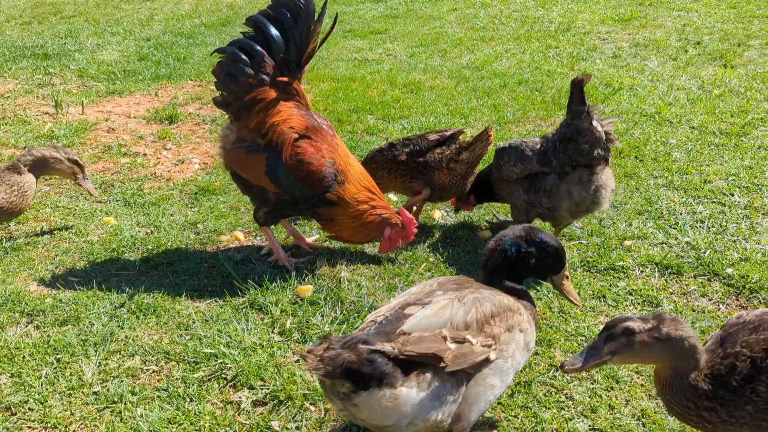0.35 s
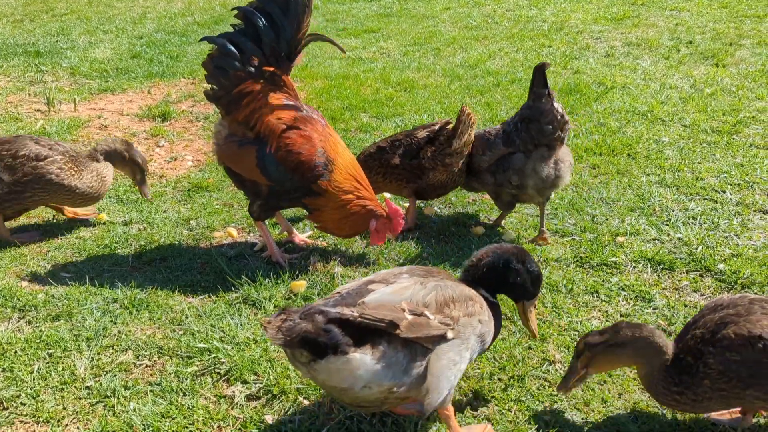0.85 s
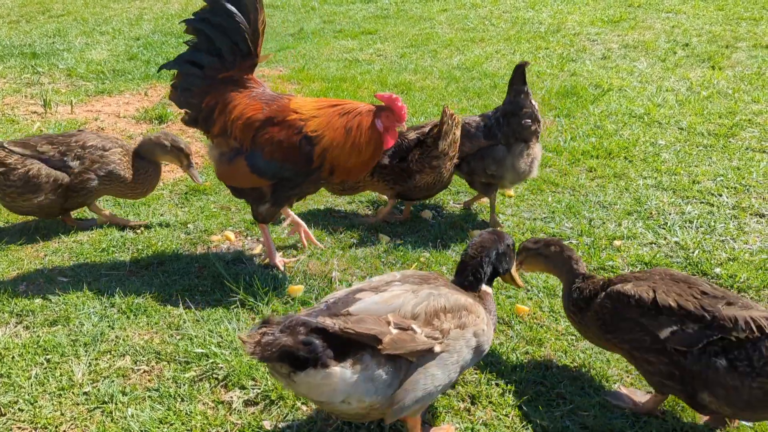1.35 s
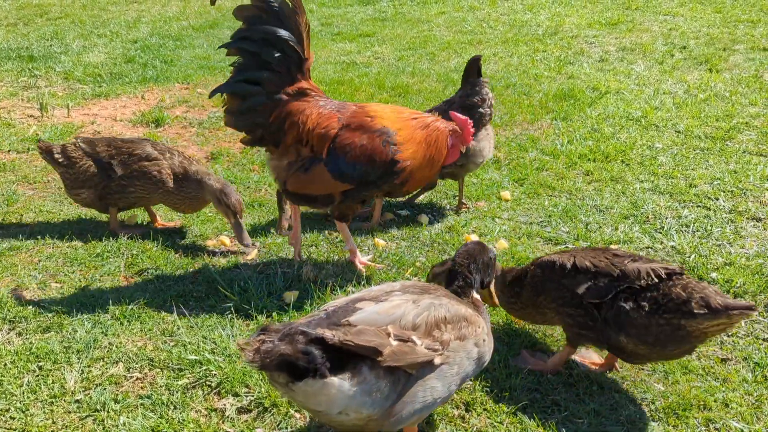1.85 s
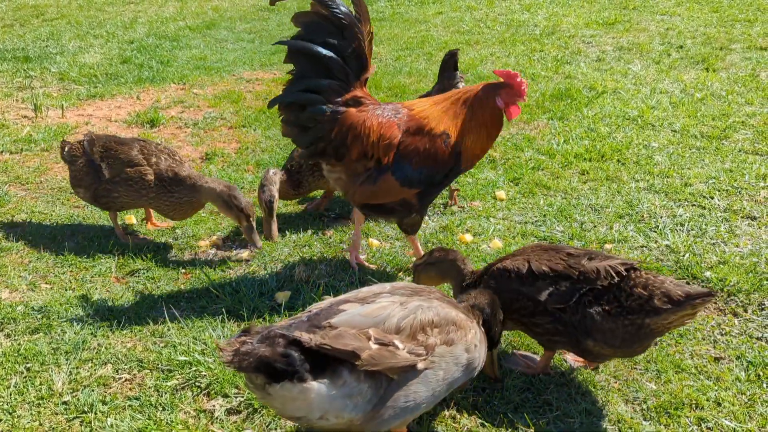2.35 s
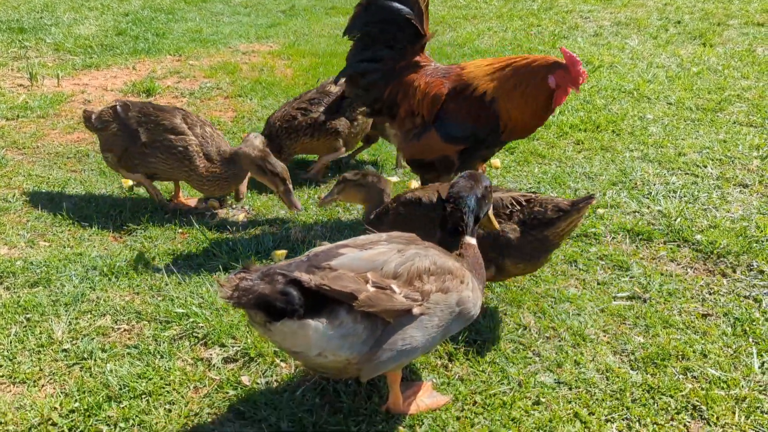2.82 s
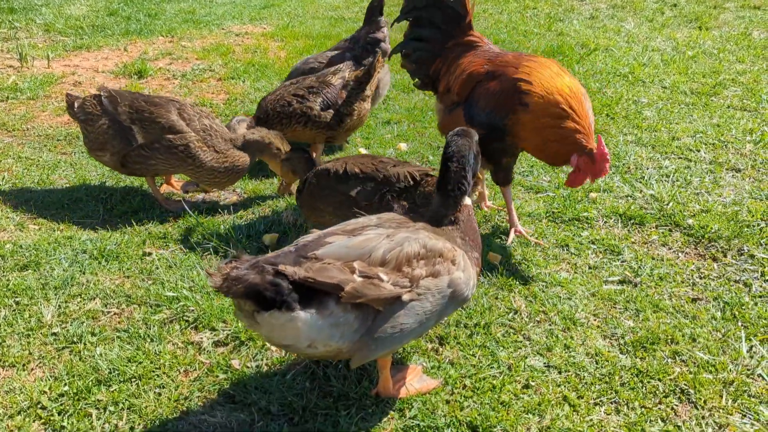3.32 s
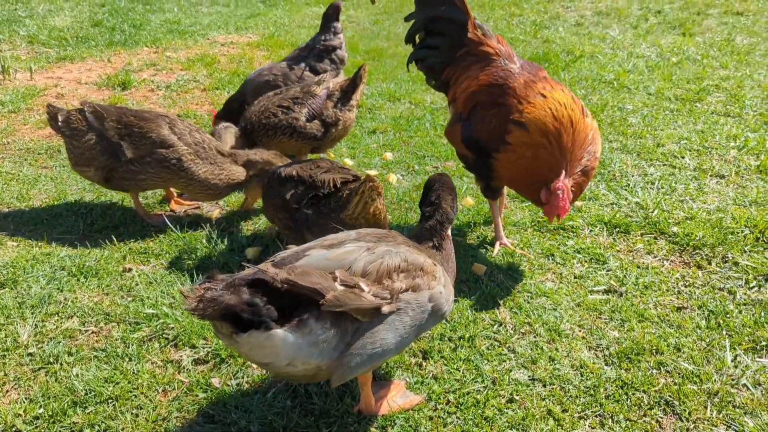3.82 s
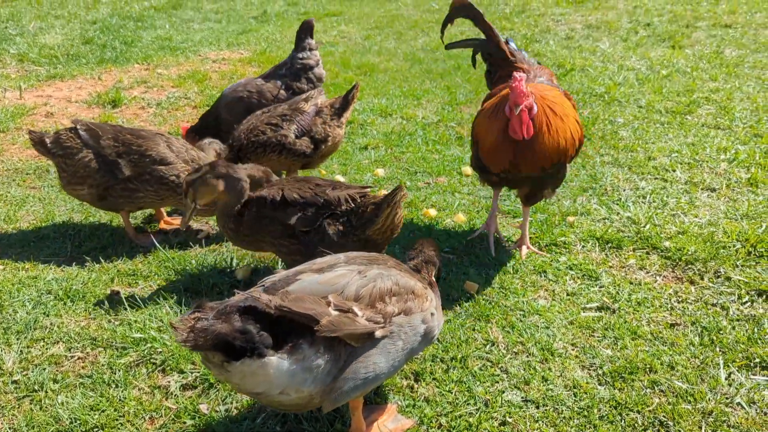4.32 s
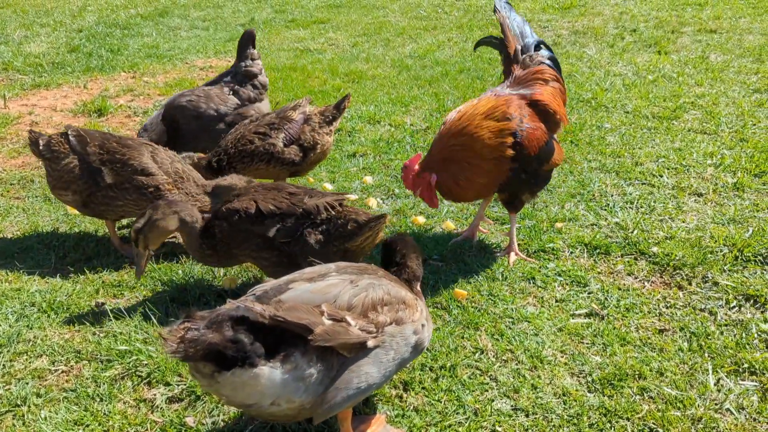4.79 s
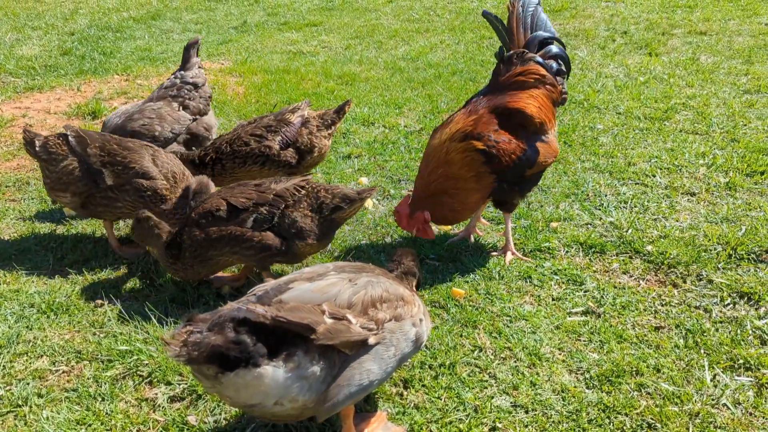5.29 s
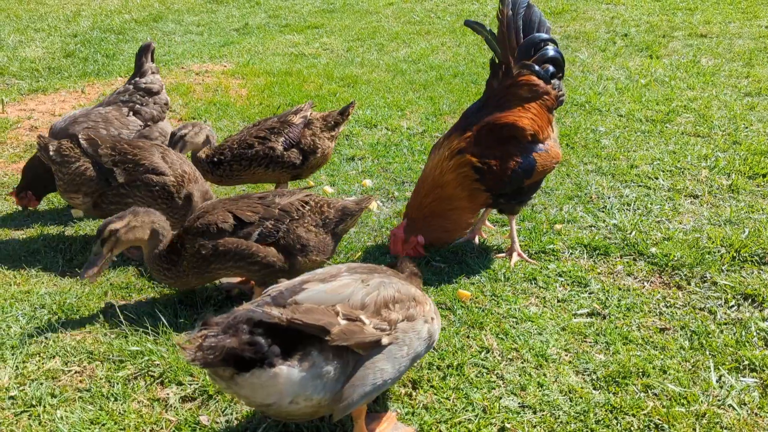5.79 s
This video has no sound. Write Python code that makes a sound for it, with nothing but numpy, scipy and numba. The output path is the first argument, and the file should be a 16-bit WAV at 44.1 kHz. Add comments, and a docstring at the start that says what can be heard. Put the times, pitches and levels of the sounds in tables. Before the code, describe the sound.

A quiet outdoor lawn, close and dry, heard in stereo through a handheld phone. A drake near the right rasps briefly at 0.2 s, then gives a breathy, fluttering rattle from 0.25 to 0.8 s, swelling toward its end. Short hoarse quacks follow at 1.3, 1.6, 2.2 and 2.45 s, then three stronger ones at 3.1, 3.4 and 3.65 s. Very short soft clucks pop at about 1.1, 3.0, 3.2, 3.8 and 5.2 s, with a brighter duck-like honk at 1.8 s. Sharp pecks tick at 1.15, 2.05 and 3.7 s; dull bumps and a bill clack come near 0.93 and 3.1 s. Grass rustles most in the first 1.5 s and again around 3.7 s. Wind thumps each side separately, mainly from 0.4 to 2.2 s. Faint songbird whistles glide at 1.4, 2.0 and 3.9-4.9 s, with a weak wavering low hum under a soft hush. The last two seconds are sparse.

```python
"""A garden lawn with a phone held over it, a microphone port at left and right, a drake close by on the right.
His soft rasps are puffs of air ringing a windpipe; clucks and one duck-like honk are short pulse trains.
Bills clack and peck among dull low bumps, all bursts of noise that ring briefly.
Feet and bills rustle the grass as filtered noise, and wind buffets each port on its own.
Far off, a songbird whistles in glides and a hum wavers over the garden's hush of coloured noise."""
import sys
import numpy as np
from scipy import signal
from scipy.fft import rfft, irfft
from scipy.io import wavfile
from scipy.ndimage import uniform_filter1d
from numba import njit

SR = 44100
rng = np.random.default_rng(int(sys.argv[2]) if len(sys.argv) > 2 else 0)


def generate_wav(signal):
    """Clip the signal to [-1, 1] and save it as 16-bit WAV at the path in sys.argv[1]."""
    frames = np.transpose(np.atleast_2d(signal))
    scaled = np.clip(frames, -1, 1) * 32767
    pcm = np.round(scaled).astype(np.int16)
    wavfile.write(sys.argv[1], SR, pcm)


def invert_db(level):
    """Linear amplitude ratio for a level in decibels (20 dB per decade), elementwise."""
    return 10 ** (np.asarray(level, dtype=float) / 20)


N = 260631
TIME = np.arange(N) / SR


def unit(x):
    """Scale to rms 1."""
    return x / np.sqrt(np.mean(x ** 2))


def pan(db):
    """Gains of left and right for a left minus right level in dB."""
    return invert_db(np.array([db / 2, -db / 2]))


@njit
def svf(x, hz, width):
    """State-variable band-pass with a moving centre, as a resonance rings."""
    y, b, l = np.empty(len(x)), 0., 0.
    for i in range(len(x)):
        g, k = np.tan(np.pi * hz[i] / SR), width / hz[i]
        v = (b + g * (x[i] + 1e-18 - l)) / (1 + g * (g + k))
        b, l, y[i] = 2 * v - b, l + 2 * g * v, k * v
    return y


def svf_pair(x, hz, first_width, second_width):
    """Two band-passes in a row on one centre, for steeper skirts."""
    return svf(svf(x, hz, first_width), hz, second_width)


def coloured(points, channels):
    """Noise of a (frequency [Hz], level [dB]) spectrum."""
    hz, db = np.transpose(points)
    log_hz = np.log(np.fft.rfftfreq(N, 1 / SR) + 1)
    gain = invert_db(np.interp(log_hz, np.log(hz), db, left=-90))
    return unit(irfft(rfft(rng.standard_normal((channels, N))) * gain, N))


def band(low_hz, high_hz):
    """Two unrelated noises between two edges."""
    edges = signal.butter(3, [low_hz, high_hz], "band", fs=SR, output="sos")
    return unit(signal.sosfilt(edges, rng.standard_normal((2, N))))


def walk(rate_hz):
    """Random levels held 1 / rate_hz and slewed twice; spread near 1."""
    k = int(SR / rate_hz)
    steps = np.repeat(rng.standard_normal(N // k + 1), k)
    return 1.3 * uniform_filter1d(uniform_filter1d(steps, k), k)[:N]


def add(out, s, sound, pan_db):
    """Place a short sound at s seconds, between left and right."""
    i = int(s * SR)
    out[:, i:i + sound.shape[-1]] += (pan(pan_db)[:, None] * sound)[:, :N - i]


def faint(count, top_db, spread_db):
    """Chance times, levels, sizes and places of small sounds, louder where the grass is busy."""
    chance = rng.random((count, 4)).T
    s = chance[0] * (TIME[-1] - .1) + .05
    busy_db = .3 * (np.interp(s, *np.transpose(GRASS_ACTIVITY)) + 80)
    return s, top_db - spread_db * chance[1] + busy_db, chance[2], 16 * (chance[3] - .5)


def ticks(events, ring_width, broad_db, rise_s):
    """A burst of noise that dies fast: a short ring at its centre over a broad crack."""
    out = np.zeros((2, N))
    t = np.arange(3000) / SR
    for s, db, hz, t60, pan_db in events:
        decay = np.exp(-np.log(1000) * t / t60)
        crack = rng.standard_normal(len(t)) * decay * np.minimum(t / rise_s, 1)
        centre = np.full(len(t), min(hz, 15000.))
        ring = svf_pair(crack, centre, ring_width * hz, 0.767 * ring_width * hz)
        broad = svf(crack, np.full(len(t), 5000.), 10040.0)
        tick = ring / abs(ring).max() + invert_db(broad_db) * broad
        add(out, s - rise_s / 2, invert_db(db) * tick, pan_db)
    return out


# spectrum of the far garden: (frequency [Hz], relative level [dB])
HUSH_COLOUR = [(88, -22), (150, 3), (280, -12), (341, -6), (637, -14), (979, -17), (1790, -16.5),
               (3350, -19), (4670, -29.5), (6140, -21.5), (9260, -42), (15100, -27.5), (16000, -41)]


def hush(level_db=-75.5):
    """Far garden noise drifting slowly; the ports hear it nearly unrelated, a little opposed in deep bass."""
    mid, side = coloured(HUSH_COLOUR, channels=2)
    bass = signal.sosfilt(signal.butter(1, 500, fs=SR, output="sos"), side)
    side = side - 2.1 * bass
    return invert_db(level_db + 0.68 * walk(0.53)) * (mid + np.array([[1], [-1]]) * side)


# course of the far tone before its quick waver: (time [s], level [dB])
HUM_COURSE = [(0.0, -95), (0.66, -70), (0.79, -67.5), (1.8, -76.5), (1.91, -65), (2.0, -77.5), (2.29, -76),
              (2.43, -100), (2.65, -71), (3.03, -92), (3.14, -60.5), (3.29, -54), (3.6, -69), (3.77, -54.5),
              (3.85, -72.5), (4.2, -74), (4.4, -89), (4.76, -77), (4.92, -60.5), (5.05, -78), (5.48, -81),
              (5.65, -57.5), (5.91, -71.5)]


def hum(hum_hz=167.1, octave_db=-83, octave_follows=0.323):
    """A far tone and its steadier octave, wavering in pitch and level, alike at both ports."""
    course_db = np.interp(TIME, *np.transpose(HUM_COURSE))
    phase = 2 * np.pi * np.cumsum(hum_hz * (1 + .01 * walk(30))) / SR
    first = invert_db(course_db + 4.5 * walk(45)) * np.sin(phase)
    upper_db = octave_db + octave_follows * (course_db + 78) + 3.5 * walk(25)
    return first + invert_db(upper_db) * np.sin(2 * phase)


# far whistles: (time [s], length [s], first, middle and last pitch [Hz], level before blur [dB])
CHIRPS = [(1.4, 0.12, 2900, 3150, 2220, -81), (3.87, 0.087, 3200, 2970, 2670, -80.5),
          (4.001, 0.055, 3400, 3040, 2950, -80.5), (4.411, 0.088, 3400, 2980, 2400, -81),
          (4.49, 0.036, 2700, 3520, 4570, -80.5), (4.54, 0.093, 4000, 3360, 2950, -76),
          (1.97, 0.07, 2900, 2550, 2300, -80), (4.719, 0.11, 1450, 1602, 1850, -81.5),
          (4.87, 0.089, 1850, 1850, 2000, -75.5)]


def songbird(warble=.045, blur_db=5.2):
    """Faint gliding whistles, unsteady in pitch and blurred in level by distance."""
    out = np.zeros((2, N))
    for s, length, *hz, db in CHIRPS:
        u = np.arange(0, length, 1 / SR) / length
        wobble, blur = unit(uniform_filter1d(rng.standard_normal((2, 8000)), size=120))[:, :len(u)]
        pitch_hz = np.interp(u, [0, .5, 1], hz) * (1 + warble * wobble)
        tone = np.sin(2 * np.pi * np.cumsum(pitch_hz) / SR)
        add(out, s, invert_db(db + blur_db * blur) * tone * np.sin(np.pi * u) ** 0.13, 0)
    return out


# spectrum of the wind at a port: (frequency [Hz], relative level [dB])
WIND_COLOUR = [(20, -26.5), (45, -2), (110, 1), (200, -10), (400, -27.5), (700, -61)]
# breeze before its gusts: (time [s], level [dB])
BREEZE = [(0.0, -74.5), (0.55, -76.5), (0.7, -62.5), (1.4, -60.5), (1.6, -72.5), (2.3, -66), (2.45, -71),
          (3.0, -73.5), (3.3, -64.5), (3.8, -65), (4.3, -76.5), (5.3, -74), (5.91, -74)]
# eddies that thump a port: (middle time [s], length [s], left level [dB], right level [dB])
THUMPS = [(0.402, 0.015, -42, -85), (0.625, 0.0091, -70, -42), (0.748, 0.11, -60, -46.5),
          (0.906, 0.012, -50, -38.5), (1.097, 0.0089, -56, -46.5), (1.183, .01, -62, -46),
          (1.282, 0.039, -66, -55), (1.456, 0.0077, -74, -53), (1.653, 0.053, -36.5, -53.5),
          (1.706, .01, -47, -75), (1.819, 0.0091, -41, -68), (1.862, 0.011, -77, -48),
          (1.961, 0.05, -44, -53), (2.232, 0.0088, -58, -48.5), (2.74, 0.11, -72.5, -65.5),
          (3.188, 0.059, -64, -59), (3.407, 0.023, -55, -62), (4.02, 0.034, -68, -71),
          (4.508, 0.052, -61.5, -84), (4.889, 0.11, -64.5, -63), (5.71, 0.1, -66.5, -63.5)]


def wind(gust_db=2.5, tilt=.4, fade_db_per_s=453):
    """Eddies thump each port on its own over a restless breeze; strong gusts reach higher in pitch."""
    low, high = coloured(WIND_COLOUR, channels=2), band(220, 468)
    breeze_db = np.interp(TIME, *np.transpose(BREEZE))
    push = np.array([invert_db(breeze_db + 4.5 * walk(10)) for _ in range(2)])
    for s, length, *port_db in THUMPS:
        near = slice(max(0, int((s - .2) * SR)), int((s + .2) * SR))
        fade_db = fade_db_per_s * np.maximum(abs(TIME[near] - s) - length / 2, 0)
        push[:, near] += invert_db(np.array(port_db)[:, None] - fade_db)
    db = 20 * np.log10(push) + gust_db * np.array([walk(35), walk(35)])
    return low * invert_db(db) + high * invert_db(db - 21.5 + tilt * (db + 46.5))


# how busy the grass is: (time [s], level [dB])
GRASS_ACTIVITY = [(0.0, -72), (0.3, -70.5), (0.58, -66), (0.89, -77.5), (1.15, -64), (1.26, -76.5),
                  (1.3, -69), (1.65, -87.5), (1.73, -81), (2.1, -80.5), (2.3, -79.5), (2.73, -76),
                  (3.35, -85.5), (3.74, -65), (3.9, -80.5), (4.99, -82.5), (5.55, -101.5), (5.65, -72),
                  (5.91, -93)]


def rustle(blades_per_s=900, size_db=4.5, grain_db=-4, low_db=-75.0, low_follows=.6):
    """Grass under feet and bills: hiss with many tiny snaps of blades."""
    high_db = np.interp(TIME, *np.transpose(GRASS_ACTIVITY))
    chance = rng.random((N, 2)).T
    snaps = (chance[0] < blades_per_s / SR) * invert_db(-size_db * np.log(chance[1]))
    snap_shape = np.exp(-abs(np.arange(-600, 601)) / (.0015 * SR))
    grain = 1 + invert_db(grain_db) * unit(signal.fftconvolve(snaps, snap_shape, "same"))
    high = invert_db(high_db + 0.9 * walk(30)) * band(8440, 17080)
    low = invert_db(low_db + low_follows * (high_db + 77) + 3.4 * walk(18)) * band(2100, 8140)
    return (high + low) * unit(grain)


# feet and bills brushing through grass: (middle time [s], level [dB], length [s], left minus right [dB])
SWISHES = [(0.041, -53, 0.024, -1), (0.29, -62, 0.032, -2), (0.408, -55, .015, -1), (0.546, -61, 0.051, 0),
           (0.738, -63, .056, -2), (0.946, -61.5, .058, 0), (1.094, -59.5, 0.048, -3),
           (1.169, -56, 0.022, -2), (1.45, -67.5, .05, 0), (1.79, -65, .024, 0), (2.418, -61, 0.012, -4),
           (2.536, -63, 0.013, -3), (2.851, -66.5, 0.027, -1.5), (3.512, -66, 0.065, 0),
           (3.66, -61, .068, 5.5), (3.758, -62.5, 0.12, 6), (3.851, -65.5, 0.077, 1),
           (4.263, -65.5, 0.048, -1), (4.527, -64.5, .056, 0), (4.945, -70.5, .027, 2),
           (5.652, -65, 0.036, -0.5), (5.721, -64, 0.025, 1)]


def swishes(alike=0.26, flicker_db=2.0, low_hz=5200):
    """Soft swells of hiss that crackle a little, partly alike at both ports; some come by chance."""
    out = np.zeros((2, N))
    s, db, size, pan_db = faint(count=8, top_db=-72, spread_db=19)
    chance_swishes = list(zip(s, db, 0.013 + 0.0091 * size, pan_db))
    high_pass = signal.butter(2, low_hz, "high", fs=SR, output="sos")
    for s, db, length, pan_db in SWISHES + chance_swishes:
        t = np.arange(-3000, 3000) / SR
        shared, left, right, flicker = rng.standard_normal((4, len(t)))
        hiss = unit(signal.sosfilt(high_pass, alike * shared + np.array([left, right])))
        level = invert_db(db + flicker_db * unit(uniform_filter1d(flicker, size=90)))
        swell = np.exp(-(2 * t / length) ** 2) * level
        start = max(0, -int((s + t[0]) * SR))  # trims what falls before the beginning
        add(out, max(0, s + t[0]), (hiss * swell)[:, start:], pan_db)
    return out


def footfalls():
    """Soft low bumps of webbed feet on the lawn."""
    s, db, size, pan_db = faint(count=30, top_db=-62.5, spread_db=6.5)
    bumps = list(zip(s, db, 170 + 330 * size, np.full(len(s), .05), pan_db))
    return ticks(bumps, ring_width=0.65, broad_db=-49.5, rise_s=0.0073)


# pecks in dry grass: (time [s], ring peak level [dB], centre [Hz], 60 dB decay [s], left minus right [dB])
PECKS = [(0.036, -58, 11300, 0.016, 0), (0.153, -56, 5800, 0.015, 12), (0.187, -47, 7600, 0.026, -4),
         (0.225, -50.5, 12500, 0.16, 5.5), (0.914, -52, 8150, 0.013, -5), (0.9887, -60, 12200, .018, 11),
         (1.028, -54.5, 9900, .025, -1.5), (1.0745, -53, 9100, 0.025, -4.5), (1.157, -38, 9290, 0.0053, -7),
         (1.286, -48.5, 6700, 0.026, 4.5), (2.0603, -36, 11000, 0.014, 8.5), (2.1984, -46, 7000, 0.012, -8),
         (2.4089, -62, 12200, 0.03, 13), (2.525, -52, 13000, 0.01, -3), (2.615, -57, 7400, .014, -13),
         (3.466, -47.5, 8140, 0.014, 8), (3.6132, -62, 13440, .015, 17), (3.7013, -45.5, 13630, .02, 2),
         (3.741, -42.5, 6430, 0.026, -6), (3.9428, -59.5, 7510, 0.024, 8), (4.721, -56.5, 5300, .015, -5),
         (4.9347, -61, 7600, 0.017, 8), (5.7082, -55, 14170, .018, 5.5)]


def pecks():
    """Sharp high ticks in dry grass, with many fainter ones between the loud."""
    s, db, size, pan_db = faint(count=14, top_db=-54, spread_db=8.5)
    small = list(zip(s, db, 5000 + 5000 * size, np.full(len(s), .021), pan_db))
    return ticks(PECKS + small, ring_width=0.63, broad_db=-33, rise_s=0.00029)


# bill clacks, and dull bumps below 800 Hz:
#     (time [s], ring peak level [dB], centre [Hz], 60 dB decay [s], left minus right [dB])
CLACKS_AND_BUMPS = [(0.036, -53, 2940, 0.018, -14), (0.152, -55, 1700, 0.11, -8),
                    (0.837, -76, 514, 0.028, 5), (0.906, -47.5, 560, 0.038, -8),
                    (0.929, -38, 586, 0.012, -6), (0.941, -51, 505, 0.007, 10),
                    (1.284, -47, 1800, 0.048, -8), (2.195, -46.5, 520, 0.059, 1),
                    (3.097, -34.5, 1248, 0.0056, -4), (3.469, -52, 464, 0.029, -4),
                    (3.76, -54.5, 1827, 0.097, -11), (4.1, -55.5, 493, 0.036, 0),
                    (4.273, -59, 3900, 0.014, -1.5), (4.613, -67.5, 787, 0.03, -9),
                    (4.722, -62.5, 567, 0.026, 0.5), (4.85, -57.5, 500, 0.035, 2),
                    (5.665, -56, 476, 0.11, 1), (5.777, -61.5, 3130, 0.02, 5)]


def clacks_and_bumps():
    """Bill snaps and dull low bumps: short rings, mostly lower than the pecks."""
    return ticks(CLACKS_AND_BUMPS, ring_width=0.83, broad_db=-48, rise_s=0.0017)


# clucks, and one brighter duck-like honk near 1.82 s: (end time [s], throat peak level [dB],
#     last pulse rate [Hz], length [s], chest level re throat [dB], overtone level re throat [dB])
CLUCKS_AND_HONK = [(0.935, -56, 241.5, 0.032, -21, 7.5), (1.078, -30.5, 246.7, 0.018, -21, -20.5),
                   (1.221, -44.5, 261, .014, -6, -13.5), (1.601, -49.5, 306, 0.029, -2, 3),
                   (1.823, -46.5, 280, 0.024, -1, 9), (1.955, -43.5, 235, 0.013, -22, -11.5),
                   (2.939, -62, 242, .006, -3, -2), (2.998, -41.5, 243, 0.021, -2.5, -9.5),
                   (3.161, -42.5, 247, 0.012, -3.5, -12), (3.263, -46, 238, 0.0097, -11, -8.5),
                   (3.376, -57, 226, .046, 0, 1.5), (3.765, -49.5, 246, 0.015, -9, -17),
                   (3.811, -28.5, 253, 0.016, -8.5, -19), (5.038, -47.5, 241, 0.023, -4.5, -33),
                   (5.227, -30.5, 254, 0.019, -6.5, -42), (5.26, -61.5, 258, .019, 13.5, -15)]
# upper resonances of the voice: (frequency [Hz], width of the narrower filter [Hz], relative level [dB])
CLUCK_OVERTONES = [(765, 400, -8), (880, 97, 1.5), (1180, 85, -1.5), (1700, 390, -9), (2300, 1200, -20)]


def clucks_and_honk(swell_db=10, chest_width=140., breath_db=-22, jitter=.45, clucks_pan_db=-0.6):
    """A few growing pulses that break off; chest and throat ring on a moment."""
    out, span = np.zeros((2, N)), np.ones(4000)
    for end, db, last_hz, length, chest_db, over_db in CLUCKS_AND_HONK:
        first_hz, throat_hz = 0.916 * last_hz, 1.794 * last_hz
        chance = rng.standard_normal((12, 2)).T
        # pulse times are counted back from the end
        t = np.arange(0, length + 1.5 / first_hz, 1 / SR)
        cycles = np.cumsum(np.interp(t, [0, length], [last_hz, first_hz])) / SR
        back = np.interp(np.arange(12), cycles, t)
        # a sliding voice is unsteady
        back = back + jitter * (last_hz / first_hz - .98) * chance[0] / last_hz
        # the earliest pulse fades in smoothly with the length
        fade_in = np.clip((length - back) * first_hz + .5, 0, 1)
        size = invert_db(chance[1] - swell_db * back / length) * fade_in
        pulses = np.zeros(len(span))
        np.add.at(pulses, ((.05 - back) * SR).astype(int), size)
        breath = uniform_filter1d(pulses, size=200) * 14 * rng.standard_normal(len(span))
        pulses += invert_db(breath_db) * breath
        note = svf_pair(pulses, throat_hz * span, 120., 300.)
        note = svf(note, .9 * throat_hz * span, 350.)
        chest = svf_pair(pulses, last_hz * span, chest_width, 250.0)
        # stronger pulses are brighter
        bright = pulses * abs(uniform_filter1d(pulses, size=200))
        over = sum(invert_db(g) * svf_pair(bright, hz * span, 1. * w, 2. * w) for hz, w, g in CLUCK_OVERTONES)
        note, chest, over = (v / abs(v).max() for v in (note, chest, over))
        voice = note - invert_db(chest_db) * chest + invert_db(over_db) * over
        add(out, end - .05, invert_db(db) * voice, clucks_pan_db)
    return out


# short quacks: (first puff time [s], last puff time [s], peak puff level [dB],
#                first and last puff under the peak [dB])
QUACKS = [(0.1826, 0.216, -38.5, 0.8, 2.3), (1.3012, 1.3467, -33, 10, 2.2), (1.5814, 1.6367, -33, 3.6, 3.3),
          (2.2172, 2.279, -37, 9.8, 24), (2.4396, 2.5185, -38, 20, 29), (3.11, 3.1664, -24, 9.8, 8.5),
          (3.3625, 3.4308, -22, 8.8, 8.8), (3.6361, 3.6941, -22, 2.5, 9.6)]
# the long rattle: (time [s], puff rate [Hz], puff level [dB], bill opening [dB])
RATTLE = [(0.2513, 54.96, -46.5, 4.5), (0.2856, 55.7, -47, 2), (0.323, 57.4, -39.5, -2.5),
          (0.3718, 60.7, -37.5, 10.5), (0.4379, 65.7, -34.5, 10), (0.5438, 66.92, -34, 10),
          (0.6159, 67.44, -30.5, 11), (0.6918, 68.6, -30.5, 20.5), (0.7199, 61.55, -33, 13),
          (0.7561, 52.5, -44.5, 1)]


def calls(puff_hz=67, slowing=0.1358, peak_at=0.57, arch=3., bill_follows=0.96):
    """Time, size and bill opening of every puff, call by call: quacks slow down, swell and die away."""
    out = []
    for first, last, peak_db, first_db, last_db in QUACKS:
        u = np.linspace(0, 1, int(round((last - first) * puff_hz)) + 1)
        rising_db = first_db * abs(1 - u / peak_at) ** arch
        falling_db = last_db * abs((u - peak_at) / (1 - peak_at)) ** arch
        under_db = np.where(u < peak_at, rising_db, falling_db)
        at = first + (last - first) * (u - slowing * u * (1 - u))
        out.append((at, peak_db - under_db, -bill_follows * under_db))
    s, hz, db, bill_db = np.transpose(RATTLE)
    t = np.arange(s[0], s[-1] + 0.18 / hz[-1], 1 / SR)
    cycles = np.cumsum(np.interp(t, s, hz)) / SR
    at = np.interp(np.arange(int(cycles[-1]) + 1), cycles, t)
    out.append((at, np.interp(at, s, db), np.interp(at, s, bill_db)))
    return sorted(out, key=lambda call: call[0][0])


# resonances of the windpipe: (frequency at rest [Hz], width of the narrower filter [Hz], level [dB],
#     share of bill opening, share of edge, share of buzz [dB per dB], left minus right [dB])
DRAKE_THROAT = [(974, 188, -7.5, -0.612, 0.063, 0.29, -0.5), (1361, 197, 0.5, -0.53, 0.25, 0.072, -8),
                (1707, 119.4, -2.5, 0.6, 0.098, 0, -7.5), (2176, 160, -13.5, 0.23, 1, 0.57, -9),
                (2707, 190, -17, -0.12, 1, 0, -5.5), (3563, 420, -28.5, 0, 0.086, 0.894, -4.5),
                (4150, 200, -32, 0.3, 0, 0.93, -5.5), (4754, 290, -25, -0.22, 0.32, 0.54, -2),
                (5190, 280, -36, 0.1, 0.029, 0.93, -2), (6200, 1070, -36.5, -0.091, 0.12, 0.71, -2.5)]
# posture of each call in order of time:
#     (second resonance [Hz], edge [dB], buzz [dB], added bill opening [dB])
POSTURE = [(1353, -3, 19, 10.5), (1399, -2, 14.5, -3), (1410, -4.5, 17.5, 18), (1370, 5.5, 9, 20),
           (1385, -14.5, 16.5, 1.5), (1382, -17.5, 15, 9.5), (1336, 2, -7.5, 4.5), (1321, -1, -4.5, 4.5),
           (1332, 0, -4.5, 3.5)]


def drake(ring_delay_s=0.001997, leak_db=-13, scatter_db=1.0, flap_db=2, flap_s=0.0027):
    """Slow puffs of air, each a rising flutter and a burst of hiss, ring the windpipe."""
    lead_in_s, rise_s, fall_s = .012, .003, .0065
    brighten, wobble, patchy_db = .75, .028, 2.6
    beats, leak = np.zeros(N, complex), np.zeros(N)
    puffs = calls()
    for at, db, _ in puffs:
        t = np.arange(at[0] - lead_in_s, at[-1] + .003, 1 / SR)
        chance = rng.standard_normal((50, 3))[:len(at)].T
        size = invert_db(db + scatter_db * chance[1])
        start = ((at - ring_delay_s + .0004 * chance[0]) * SR).astype(int)
        beats[start] = size * np.exp(2j * np.pi * chance[2])
        leak[(t * SR).astype(int)] = invert_db(np.interp(t, at, db) + leak_db)
    t = np.arange(-1300, 1301) / SR
    puff = np.where(t < 0, np.exp(-(t / rise_s) ** 2), np.exp(-t / fall_s))
    steady_air = uniform_filter1d(uniform_filter1d(np.roll(leak, -250), size=700), size=700)
    flow = signal.fftconvolve(abs(beats), puff, "same") + steady_air
    # the flapping membrane speeds up as the pressure builds: 260 Hz per ms
    flutter = np.exp(-(t / flap_s) ** 2 + 2j * np.pi * np.cumsum(1600 + 260 * t * 1000) / SR)
    flapping = signal.fftconvolve(beats, flutter, "same").real
    air = flow * rng.standard_normal(N) + invert_db(flap_db) * flapping
    # the treble comes only from the sharp crest of each puff
    crest = signal.fftconvolve(abs(beats), puff ** 1.3, "same") * rng.standard_normal(N) * invert_db(2)
    s, puff_db, bill_db = np.hstack(puffs)
    effort_db = brighten * (np.interp(TIME, s, puff_db) + 34.5)  # harder puffs are brighter
    posture_starts = [at[0] - .015 for at, _, _ in puffs[1:]]
    throat_hz, edge_db, buzz_db, open_db = np.array(POSTURE)[np.searchsorted(posture_starts, TIME)].T
    bill_db = np.interp(TIME, s, bill_db) + open_db
    out = 0
    for k, (hz, width, db, bill, edge, buzz, pan_db) in enumerate(DRAKE_THROAT):
        # soft tissue: each resonance shifts and answers differently from puff to puff
        moved_hz = hz * throat_hz / DRAKE_THROAT[1][0] * (1 + wobble * walk(50))
        driven = (crest if hz > 3000 else air) * invert_db(patchy_db * walk(90))
        ring = svf_pair(driven, moved_hz, 1. * width, 2. * width)
        level_db = db + bill * bill_db + edge * (edge_db + effort_db) + buzz * (buzz_db + effort_db) + 0.5
        out = out + (-1) ** k * pan(pan_db)[:, None] * ring * invert_db(level_db)
    out = signal.sosfilt(signal.butter(4, 800, "high", fs=SR, output="sos"), out)
    return np.array([np.roll(out[0], 2), out[1]])  # nearer the right port: left hears it two samples later


def scene():
    """All sources together, and a faint echo of the birds, clacks, bumps and pecks off the ground."""
    echoed = songbird() + pecks() + clacks_and_bumps() + clucks_and_honk() + drake()
    t = np.arange(6000) / SR
    tail = rng.standard_normal((2, len(t))) * np.exp(-np.log(1000) * t / 0.073) * (t > .004)
    echoed = echoed + invert_db(-51.0) * signal.fftconvolve(echoed, tail, axes=1)[:, :N]
    return hush() + hum() + wind() + rustle() + swishes() + footfalls() + echoed


def top_cut(x):
    """Nothing passes above the cut-off."""
    return signal.sosfilt(signal.butter(12, 16470, fs=SR, output="sos"), x)


def record(dry):
    """Deep bass rolls off at the phone's microphones."""
    low_cut = signal.butter(3, 42, "high", fs=SR, output="sos")
    mix = signal.sosfilt(low_cut, dry)
    return top_cut(mix)


dry = scene()
out = record(dry)
generate_wav(out)
```